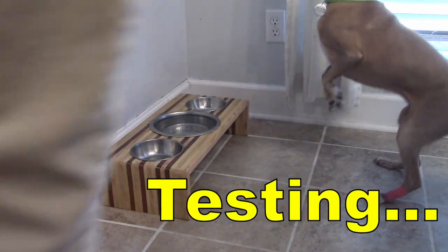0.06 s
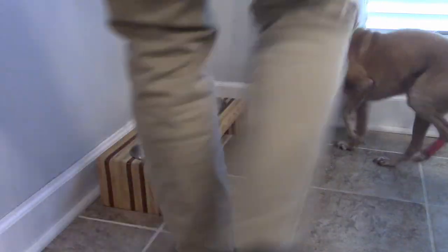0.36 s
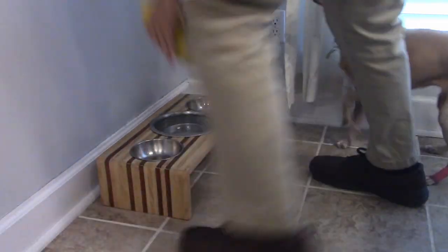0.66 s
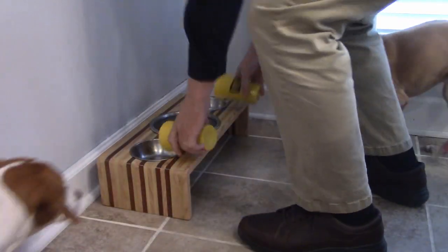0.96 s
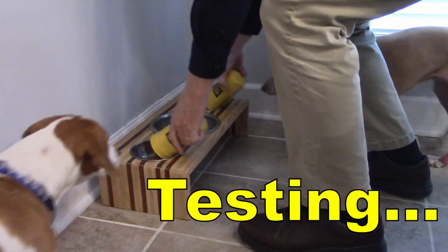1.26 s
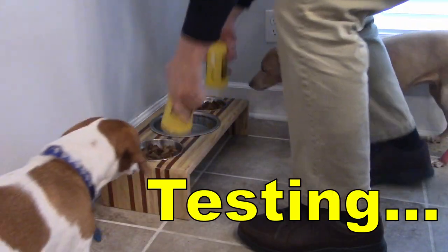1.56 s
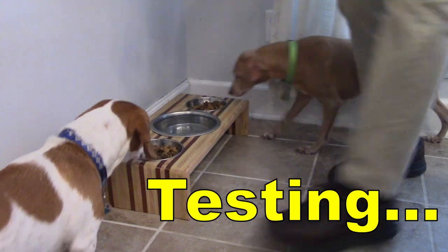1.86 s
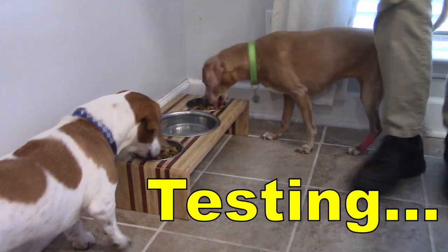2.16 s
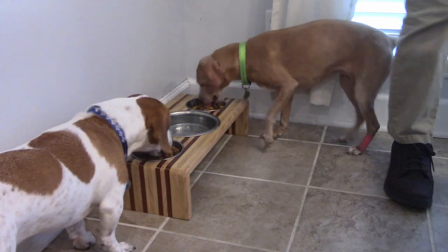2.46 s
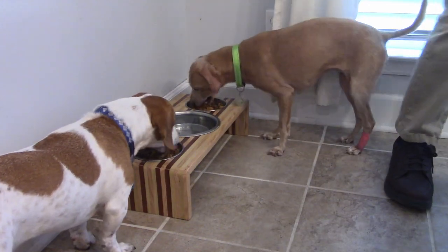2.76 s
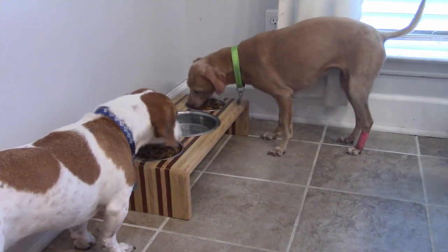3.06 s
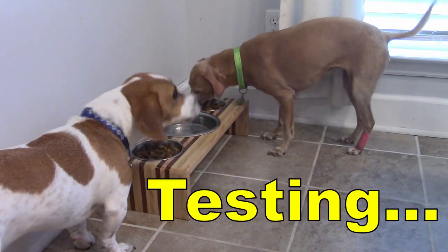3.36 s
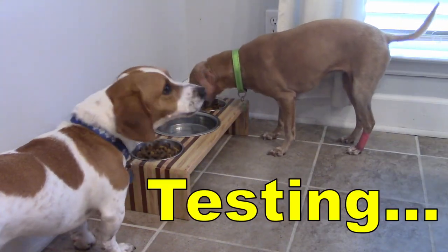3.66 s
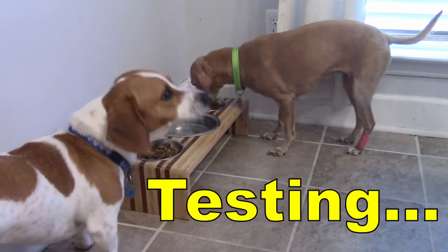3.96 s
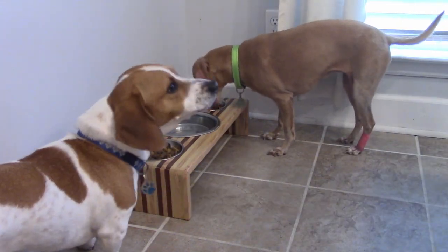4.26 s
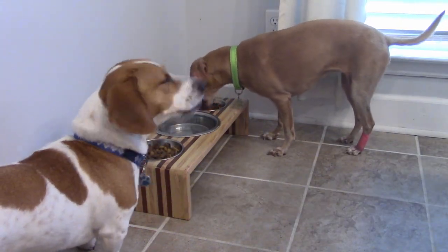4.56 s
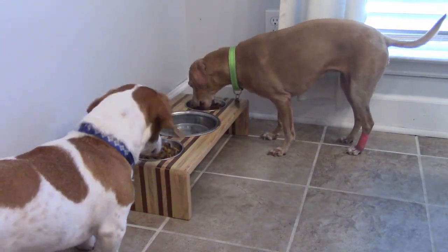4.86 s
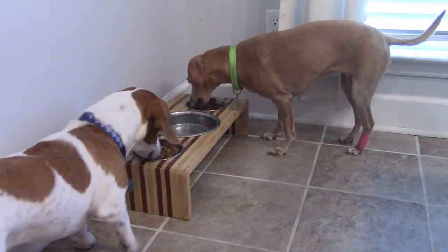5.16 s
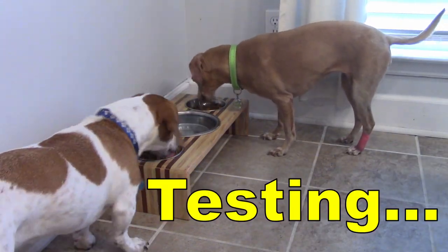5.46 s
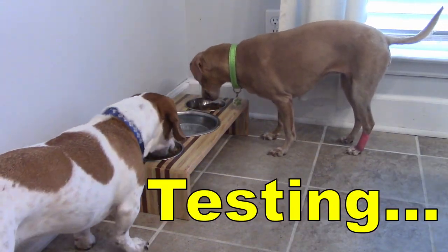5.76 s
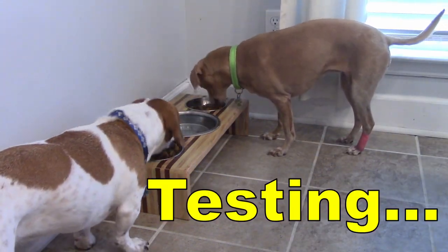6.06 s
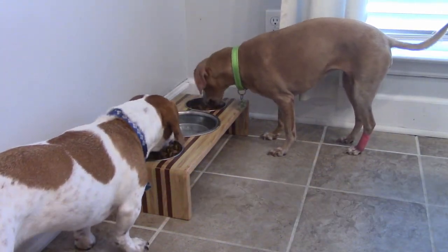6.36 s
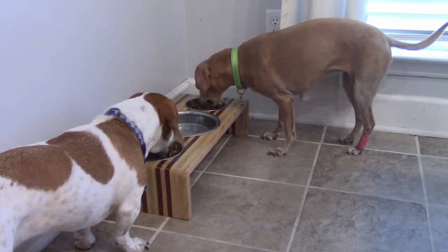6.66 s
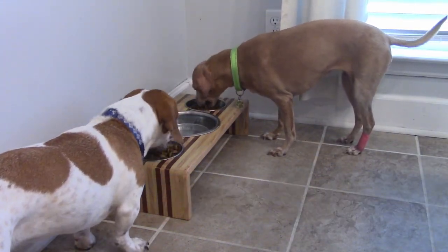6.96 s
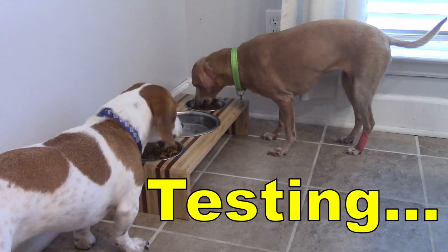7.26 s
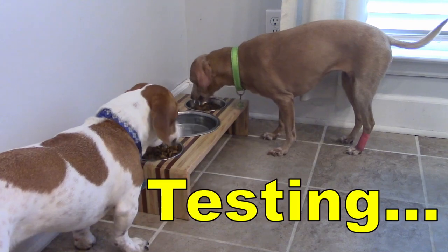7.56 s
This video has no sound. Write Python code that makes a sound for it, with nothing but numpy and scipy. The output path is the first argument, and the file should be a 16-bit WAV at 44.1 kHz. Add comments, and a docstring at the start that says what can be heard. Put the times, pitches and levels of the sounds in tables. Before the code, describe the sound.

For the first second, shoes thud and dog claws tap on a tiled floor while trousers brush past. At about 1 second hollow plastic cups knock against steel bowls, and from 1.2 seconds kibble pours in with a loud rattle, ringing the metal until the heap muffles it and the flow trickles out before 2 seconds. Near 2.2 seconds there is a step and a short rubber sole squeak. From about 2.4 seconds to the end, near 7.7 seconds, two dogs eat more quietly, with irregular crunches, wet lip smacks, gulps and the soft scrape of muzzles pushing food. Smacks and swallows cluster between 3 and 4 seconds, and sharper bites stand out around 4.6 and 6.2 seconds. Light, high metal clinks come just before 3 seconds and near 6.2 and 7 seconds. Everything sounds nearby, with a short bright echo and faint steady air noise.

```python
"""Feeding time in a tiled room. Shoes and claws tap the floor as someone steps up to a wooden stand.
At 1 s two plastic cups knock on steel bowls; kibble pours in, ringing the steel until the heap muffles it.
The person steps back and a rubber sole squeaks. From 2.35 s two dogs nose through the food, crunch,
smack and gulp; now and then a tag or kibble clinks on a bowl.
A bright echo and faint air noise throughout."""
import sys
import numpy as np
from scipy import signal
from scipy.fft import rfft, irfft, next_fast_len
from scipy.io import wavfile
from scipy.ndimage import uniform_filter1d, minimum_filter1d

SR = 44100
rng = np.random.default_rng(int(sys.argv[2]) if len(sys.argv) > 2 else 0)


def generate_wav(sig):
    """Save sig (samples, or channels by samples) to the path in sys.argv[1] as 16-bit PCM at SR."""
    pcm = np.round(np.clip(np.atleast_2d(sig).T, -1, 1) * 32767).astype(np.int16)
    wavfile.write(sys.argv[1], SR, pcm)


N = 340893
TIME = np.arange(N) / SR
MEAL_START_S = 2.35

# spectrum of falling kibble: f/Hz, level/dB
POUR_SPECTRUM = [(120, -50), (200, -20), (345, -0.5), (650, -6.5), (850, -1.5), (2170, 1.5), (3300, -1.5),
                 (7000, -3), (10000, -11), (13000, -17), (15500, -33)]


def pour():
    """Kibble runs at full flow, then trickles out; it drums on bare steel until the heap covers it."""
    flow = gate(1.166) * fade(start_s=1.418, db_per_s=64.5)
    clatter = from_db(-21) * flow * coloured(grains(per_s=1600, spread_db=-0.5), POUR_SPECTRUM)
    on_steel = flow * fade(start_s=1.218, db_per_s=97)
    sparkle = bowl_upper_modes(from_db(-19) * on_steel, t60_s=0.092, count=36)
    return clatter + sparkle + bowls(from_db(-3.5) * on_steel, t60_1khz_s=0.27)


def bowls(flow, t60_1khz_s):
    """Hard blows and pattering pellets ring the same steel modes; high modes die sooner."""
    # steel modes: f/Hz, level/dB
    modes = [(360, -18.5), (522, -21), (824, -5), (856, -10), (1256, -4), (1841, -10), (1992, -5),
             (2101, 0), (3464, -8.5), (4285, -14), (4560, -18), (5240, -14), (5690, -16), (5998, -10),
             (6246, -10), (6880, -6), (7160, -14), (7730, -21), (8107, -16), (8282, -11), (8890, -29),
             (9249, -15), (9549, -8), (10121, -11), (11013, -17)]
    # blows on a bowl: t/s, level/dB, contact cut-off/Hz
    blows = [(0.976, -9, 700), (1.032, -18, 900), (1.1655, -5, 2945)]
    out = np.zeros(N)
    patter = grains(per_s=800, spread_db=4) * flow
    for hz, db in modes:
        t60_s = t60_1khz_s * (hz / 1000) ** -.25
        clicks = patter * rng.standard_normal(N) / np.sqrt(t60_s * SR)
        for s, blow_db, contact_hz in blows:
            clicks[round(s * SR)] += rng.choice([-1, 1]) * from_db(blow_db) / np.hypot(1, hz / contact_hz)
        out += from_db(db) * ring(clicks, hz, t60_s)
    return butter(out, 270, "high", order=3)  # the bowls carry no bass below about 270 Hz


def bowl_upper_modes(flow, t60_s, count):
    """Crowded steel modes from about 3 kHz up; each pellet excites them unevenly."""
    pellets = grains(per_s=290, spread_db=5.5) * flow
    modes_hz = np.geomspace(3000, 13000, count) * rng.uniform(.98, 1.02, count)
    out = np.zeros(N)
    for hz in modes_hz:
        out += from_db(at_hz(POUR_SPECTRUM, hz)) * ring(pellets * rng.standard_normal(N), hz, t60_s)
    return out / np.sqrt(t60_s * SR)


def cups():
    """Hollow plastic cups knock on bowls and stand."""
    # knocks: t/s, level/dB, tilt/(dB/band)
    knocks = [(0.976, -11, -4), (1.003, -23, -4.5), (1.029, -15, -1.5), (1.074, -21.5, -1.5),
              (1.247, -8, 0), (1.468, -30, 9.5)]
    return contacts(knocks, lowest_hz=321, band_db=[-5, -1, -2.5, -12], t60_s=0.083,
                    grit_db=5.5, rise_s=0.00051, hollow_hz=1390, hollow_db=-11)


def bites(faint_count, gap_s):
    """Kibble cracks between teeth or against steel; faint bites fall loosely among the loud ones."""
    # loud bites: t/s, level/dB, tilt/(dB/band)
    loud = [(2.496, -33.5, -2.5), (2.654, -35, -0.5), (2.796, -27.5, 1.5), (2.891, -41, 11.5),
            (2.939, -28.5, -0.5), (3.144, -31.5, -8), (3.195, -32.5, 2.5), (3.365, -38, -9.5),
            (3.460, -40, 5), (3.953, -39, 7.5), (4.084, -41.5, 0.5), (4.551, -32, -4.5), (4.563, -25, 2.5),
            (5.020, -33, 0), (5.113, -41, -2), (5.258, -41, 4.5), (5.399, -31.5, -2.5),
            (5.525, -43.5, 10.5), (5.560, -50, 11), (5.740, -38, 0), (6.150, -22.5, 5), (6.541, -38, -5.5),
            (6.692, -29.5, -2), (7.080, -29, -3.5), (7.488, -34.5, -3.5)]
    jitter, spread_db, tilt_db = rng.standard_normal((faint_count, 3)).T
    s = MEAL_START_S + gap_s * (np.arange(faint_count) + .5 + .25 * jitter)
    faint = np.transpose([s, -44.5 + spread_db, tilt_db])[s < N / SR - .01]
    return contacts(loud + list(faint), lowest_hz=286, band_db=[-6, 1.3, -1.5, -12.5], t60_s=0.038,
                    grit_db=5, rise_s=0.0031, hollow_hz=1933, hollow_db=-19.5)


def lip_smacks():
    """Lips and tongue part and the mouth pops; harder smacks are shorter."""
    # smacks: t/s, level/dB, mouth f/Hz
    smacks = [(2.350, -19, 1330), (2.998, -31, 1360), (3.081, -22, 1470), (3.136, -26, 1324),
              (3.6264, -21, 1330), (3.724, -24.5, 1314), (3.878, -29, 1350), (4.68, -36.5, 1470),
              (5.400, -25, 1630), (6.583, -26.5, 1360), (6.638, -36, 1470), (7.2417, -28.5, 1338),
              (7.685, -37, 1785)]
    length_s, halving_db = 0.0098, 7.5
    rows = [(s, db, hz, length_s * .5 ** ((db + 24) / halving_db)) for s, db, hz in smacks]
    return from_db(3.5) * pops(rows, rise_s=0.00011, glide=0.017, waver=0.068)


def gulps():
    """Closing jaws and swallows ring the throat."""
    # swallows: t/s, level/dB, throat f/Hz
    swallows = [(2.501, -37, 372), (3.063, -28.5, 550), (3.079, -21, 500), (3.140, -29, 643),
                (3.376, -37, 340), (3.415, -29, 580), (3.630, -34, 526), (3.677, -33.5, 650),
                (3.877, -35, 580), (6.457, -38, 454), (6.586, -32, 625), (6.749, -35, 298),
                (7.150, -31.5, 790), (7.245, -33.5, 570)]
    return from_db(8) * thuds(swallows, push_s=0.005, ring_cycles=11.3)


def chewing(level_db, per_s, ring_cycles):
    """Small wet ticks all through the meal, each ringing the mouth at one of twelve pitches."""
    eating = np.interp(TIME, [2.2, 2.5], [0, 1])
    mouth_hz = np.geomspace(1200, 3400, 12)
    ticks = grains(per_s, spread_db=5)
    choice = rng.integers(0, len(mouth_hz), N)
    rings = sum(ring(ticks * (choice == k), hz, ring_cycles / hz) for k, hz in enumerate(mouth_hz))
    return from_db(level_db) * eating * rms_one(rings)


def muzzles():
    """Kibble shifts softly all through the meal and scrapes louder with each shove."""
    # muzzle shoves: peak t/s, level/dB, hiss tilt/dB
    shoves = [(2.56, -42, -0.5), (2.74, -59, -4), (2.93, -39, 7), (3.20, -41.5, -2), (3.50, -37.5, -2.5),
              (3.67, -39, -5), (3.89, -41, -1), (4.19, -45.5, 2), (4.278, -40, 8), (4.62, -45, -9),
              (4.821, -53.5, 22.5), (5.47, -38.5, -1.5), (5.553, -33.5, -6), (5.68, -42.5, -10),
              (5.882, -35, -5.5), (6.05, -39, -1.5), (6.18, -38, 1), (6.47, -43, -11), (6.62, -44, -6),
              (6.77, -44, -6), (6.922, -39.5, 1.5), (7.109, -40, -6.5), (7.49, -41.5, -5)]
    # stirring between shoves: t/s, level/dB
    stirring = [(2.35, -29.5), (2.51, -40.5), (2.74, -33.5), (2.99, -29.5), (3.44, -41.5), (3.58, -38),
                (4.47, -46.5), (4.79, -45), (5.12, -45), (5.37, -42), (5.57, -37.5), (6.45, -43),
                (6.91, -41), (7.72, -45.5)]
    # spectrum of shifting kibble: f/Hz, level/dB
    spectrum = [(71, -69), (120, -12.5), (325, 7), (488, 0.5), (552, 4.5), (955, -2), (1790, -3.5),
                (3580, -7), (5610, -7.5), (10300, -19), (15500, -41)]
    rise_s, fall_s = 0.033, 0.043
    strokes = [(*shove, rise_s, fall_s) for shove in shoves]
    scrapes = rubbing(strokes, spectrum, per_s=2000, spread_db=2.5,
                      band_db=[-4.5, -2.5, -2], bass_follows=0.095)
    activity = gate(MEAL_START_S) * from_db(np.interp(TIME, *np.transpose(stirring)) - 7.5)
    return scrapes + activity * coloured(grains(per_s=1500, spread_db=3.5), spectrum)


def steel_clinks():
    """A tag or kibble clinks on a bowl; the metal rings on a few close modes, higher ones dying sooner."""
    # clinks: t/s, level/dB, f/Hz
    clinks = [(2.797, -41, 5260), (2.861, -38, 5270), (2.891, -40, 6000), (2.940, -38, 5230),
              (2.965, -31, 5210), (3.335, -48.5, 10600), (6.156, -32, 5840), (7.036, -38, 10640),
              (7.250, -48, 10500)]
    # metal modes: frequency ratio, level/dB
    modes = [(1, 4), (1.013, -6), (1.17, -16), (1.43, -18)]
    chatter_s, t60_5khz_s = .004, 0.19
    out, t = np.zeros(N), TIME[:SR // 2]
    for s, db, hz in clinks:
        chatter = rng.standard_normal(len(t)) * np.exp(-t / chatter_s)
        for ratio, mode_db in modes:
            t60_s = t60_5khz_s * (hz * ratio / 5000) ** -2.5
            ping = ring(chatter, hz * ratio, t60_s)
            add(out, s, from_db(db + mode_db) * ping / np.abs(ping).max())
    return out


def footsteps():
    """Dull soles and bright claws tap the tiles; heels thud."""
    # soles and claws: t/s, level/dB, tilt/(dB/band)
    steps = [(0.036, -45.5, 9), (0.143, -21, -5), (0.262, -29.5, 1), (0.315, -28.5, 3.5), (0.401, -48, 13),
             (0.431, -41.5, 14), (0.559, -35.5, -11.5), (0.885, -27.5, 1.5), (0.904, -34.5, 3.5),
             (1.874, -51.5, 13), (2.194, -25.5, -5.5)]
    # heel strikes: t/s, peak/dB, f/Hz
    heels = [(0.145, -17.5, 235), (0.263, -24, 193), (0.318, -15.5, 990), (0.562, -32.5, 202)]
    taps = contacts(steps, lowest_hz=170, band_db=[-9.5, -7.5, 2, -8], t60_s=0.038,
                    grit_db=9.5, rise_s=0.0028, hollow_hz=1330, hollow_db=-17)
    return taps + thuds(heels, push_s=0.012, ring_cycles=3.2)


def sole_squeak(start_s, slips):
    """Rubber sticks and slips; the run slows, weakens and sinks in pitch as the foot settles."""
    first_hz, settled_hz = 580, 493
    first_db, loss_db = -15, 2
    length_s, gap_s, slowing = 0.016, 0.016, 1.2
    rows, s = [], start_s
    for k in range(slips):
        hz = settled_hz + (first_hz - settled_hz) * np.exp(-2 * k)
        rows.append((s, first_db - loss_db * k, hz, length_s))
        s += gap_s * slowing ** k
    return pops(rows, rise_s=0.0016, glide=-0.014, waver=0.074)


def brushing():
    """Trousers and soles brush past."""
    # strokes: peak t/s, level/dB, hiss tilt/dB, rise/s, fall/s
    strokes = [(0.04, -55, 14, 0.11, .1), (0.16, -29, 3.5, 0.0071, 0.053), (0.28, -45, 2, 0.18, 0.33),
               (0.62, -32.5, 8, 0.026, 0.043), (0.775, -28.5, 6, 0.068, 0.044),
               (0.91, -37.5, 8, 0.019, 0.45), (2.205, -33, 3, 0.056, 0.079)]
    # friction spectrum: f/Hz, level/dB
    spectrum = [(47, -37), (80, 3), (446, 5), (594, 3), (1100, -6), (2130, -1), (3870, 4.5), (9760, -7),
                (13300, -18.5), (15500, -26)]
    return rubbing(strokes, spectrum, per_s=5000, spread_db=-1, band_db=[-13, -.8, -1], bass_follows=0.44)


def room(x, build_s):
    """Tiles and bare walls return a dense, bright tail that dies band by band."""
    # room decay: f/Hz, t60/s
    decay = [(150, 0.13), (500, 0.61), (1400, 0.49), (4000, 0.64), (9000, 0.67), (15000, 0.087)]
    t, response = TIME[:SR], 0
    edges_hz = np.geomspace(70, 17000, 13)
    for low, high in zip(edges_hz, edges_hz[1:]):
        t60_s = at_hz(decay, np.sqrt(low * high))
        band = butter(rng.standard_normal(len(t)), [low, high], "band")
        response = response + band * from_db(-60 * t / t60_s)
    response = response * (1 - np.exp(-t / build_s))
    return signal.fftconvolve(x, response / np.linalg.norm(response))[:N]


def air(level_db):
    """Steady air noise of the room."""
    # air spectrum: f/Hz, level/dB
    spectrum = [(15, -40), (25, -3), (82, 4.5), (152, 3.5), (289, 5.5), (722, -2.5), (1080, 1), (2770, -16),
                (5010, -4.5), (5880, -3.5), (8350, -46), (10400, -24.5), (15500, -29)]
    return from_db(level_db) * coloured(rng.standard_normal(N), spectrum)


def contacts(table, lowest_hz, band_db, t60_s, grit_db, rise_s, hollow_hz, hollow_db):
    """Each contact is a dying volley of tiny impacts that rings a hollow; positive tilt is brighter."""
    # upper edges of thud, body, snap and fizz: f/Hz
    upper_edges_hz = [800, 2700, 7000, 12500]
    edges_hz = [lowest_hz] + upper_edges_hz
    out, t = np.zeros(N), TIME[:SR // 6]
    envelope = (1 - np.exp(-t / rise_s)) * from_db(-60 * t / t60_s)
    bands_from_pivot = np.arange(len(band_db)) - (len(band_db) - 1.5) / 2
    for s, level_db, tilt_db in table:
        volley = envelope * rng.standard_normal(len(t)) * from_db(grit_db * rng.standard_normal(len(t)))
        hollow = ring(volley, hollow_hz * rng.uniform(.8, 1.25), t60_s=.007)
        knock = rms_one(volley) + from_db(hollow_db) * rms_one(hollow)
        for k, colour_db in enumerate(band_db + tilt_db * bands_from_pivot):
            band = butter(knock, edges_hz[k:k + 2], "band", order=3)
            peak_rms = np.sqrt(uniform_filter1d(band ** 2, size=SR // 250).max())
            add(out, s, from_db(level_db + colour_db) * band / peak_rms)
    return out


def pops(table, rise_s, glide, waver):
    """A cavity or a sole rings for a few cycles while its pitch slides and wavers."""
    out, t = np.zeros(N), TIME[:SR // 12]
    for s, peak_db, hz, length_s in table:
        age = t / max(length_s, .002)
        wobble = rms_one(butter(rng.standard_normal(len(t)), 480, "low"))
        pitch_hz = hz * (1 + glide * (np.minimum(age, 1) - .5) + waver * wobble)
        tone = np.sin(2 * np.pi * np.cumsum(pitch_hz) / SR)
        swell = (1 - np.exp(-t / rise_s)) * np.exp(-2 * age ** 2)
        add(out, s, from_db(peak_db) * swell / swell.max() * tone)
    return out


def thuds(table, push_s, ring_cycles):
    """A short rough push rings a heavily damped body."""
    out, t = np.zeros(N), TIME[:SR // 8]
    for s, peak_db, hz in table:
        push = rng.standard_normal(len(t)) * np.exp(-3 * t / push_s)
        body = butter(ring(push, hz, ring_cycles / hz), hz * 0.61, "high", order=4)
        add(out, s, from_db(peak_db) * body / np.abs(body).max())
    return out


def rubbing(strokes, spectrum, per_s, spread_db, band_db, bass_follows):
    """Tiny catches swell and fade with each stroke; force adds more scrape and hiss than bass."""
    # edges of bass, scrape and hiss: f/Hz
    edges_hz = [60, 800, 2500, 16000]
    friction, out = coloured(grains(per_s, spread_db), spectrum), 0
    s, level_db, hiss_db, rise_s, fall_s = np.transpose(strokes)
    t = TIME[::40, None]
    swells = np.exp(-((t - s) / np.where(t < s, rise_s, fall_s)) ** 2)
    bass_db = level_db.mean() + bass_follows * (level_db - level_db.mean())
    for k, db in enumerate([bass_db, level_db - hiss_db / 2, level_db + hiss_db / 2]):
        power = swells @ from_db(db + band_db[k]) ** 2
        gain = np.interp(TIME, t[:, 0], np.sqrt(power))
        out = out + gain * rms_one(butter(friction, edges_hz[k:k + 2], "band", order=3))
    return out


def grains(per_s, spread_db):
    """Random clicks of uneven size and sign; rms 1."""
    sizes = from_db(spread_db * np.minimum(rng.exponential(1, N), 4)) * rng.choice([-1, 1], N)
    return rms_one(sizes * (rng.random(N) < per_s / SR))


def ring(clicks, hz, t60_s):
    """One mode: a unit click starts a decaying sine of height 1."""
    r, w = from_db(-60 / (t60_s * SR)), 2 * np.pi * hz / SR
    return signal.lfilter([0, np.sin(w)], [1, -2 * r * np.cos(w), r * r], clicks + 1e-18)


def coloured(x, spectrum):
    """Give a steady sound a spectrum; rms 1."""
    size = next_fast_len(N)
    gain = from_db(at_hz(spectrum, np.arange(size // 2 + 1) * SR / size))
    return rms_one(irfft(rfft(x, size) * gain, size)[:N])


def butter(x, hz, kind, order=2):
    """Causal Butterworth filter."""
    sos = signal.butter(order, np.clip(hz, 10, .45 * SR), kind, fs=SR, output="sos")
    return signal.sosfilt(sos, x + 1e-18)


def gate(start_s):
    """Silent, then open within 1 ms."""
    return np.clip((TIME - start_s) * 1000, 0, 1)


def fade(start_s, db_per_s):
    """Full level, then a steady fall."""
    return from_db(-db_per_s * np.maximum(TIME - start_s, 0))


def add(out, s, sound):
    """Mix a short sound in at a time."""
    start = max(round(s * SR), 0)
    out[start:start + len(sound)] += sound[:N - start]


def at_hz(points, hz):
    """Read a table on a log-frequency axis."""
    known_hz, values = np.transpose(points)
    return np.interp(np.log(np.maximum(hz, 1)), np.log(known_hz), values)


def from_db(db):
    """Decibels to gain."""
    return 10 ** (np.asarray(db) / 20)


def rms_one(x):
    """Scale to rms 1."""
    return x / np.sqrt(np.mean(x ** 2) + 1e-20)


def scene():
    """Steps, cups, pour and meal in one room; three groups feed the echo at their own levels."""
    sharp = footsteps() + cups() + bites(faint_count=18, gap_s=.3)
    smacks = lip_smacks()
    sharp += gulps()
    dense = brushing()
    sharp += sole_squeak(start_s=2.196, slips=5) + steel_clinks()
    sharp += chewing(level_db=-52, per_s=37, ring_cycles=9.4)
    dense += pour() + muzzles()
    send = from_db(-5.5) * sharp + from_db(-10) * dense + from_db(-6.5) * smacks
    echo = room(send, build_s=0.0023)
    return (sharp + smacks + dense + echo + air(level_db=-48))[None]


def record(dry):
    """A limiter holds the loudest peaks down; a steep low-pass cuts the top."""
    ceiling_db, release_db_per_s, cutoff_hz = -6, 120, 15900
    over_db = np.maximum(20 * np.log10(np.abs(dry[0]) + 1e-9) - ceiling_db, 0)
    held_db = np.maximum.accumulate(over_db + release_db_per_s * TIME) - release_db_per_s * TIME
    gain_db = minimum_filter1d(-held_db, size=160)  # ducks just ahead of each peak
    limited = dry * from_db(uniform_filter1d(gain_db, size=160))
    return signal.sosfilt(signal.ellip(10, .1, 80, cutoff_hz, fs=SR, output="sos"), limited)


dry = scene()
out = record(dry)
generate_wav(out)
```